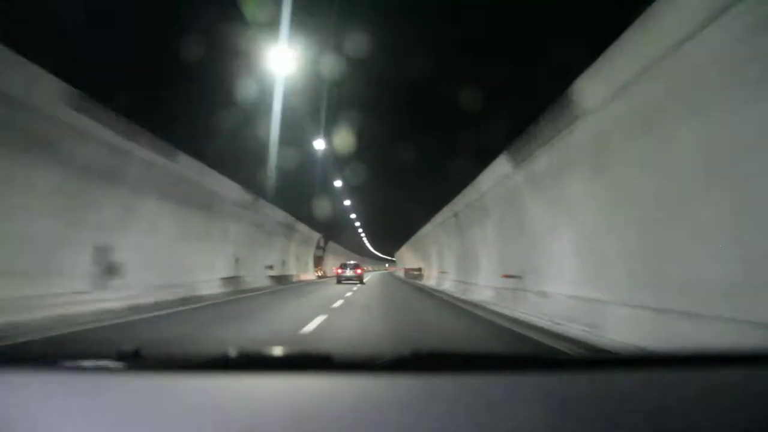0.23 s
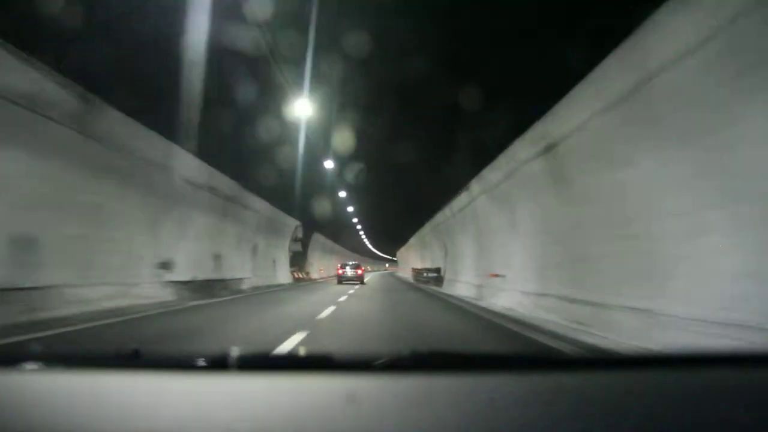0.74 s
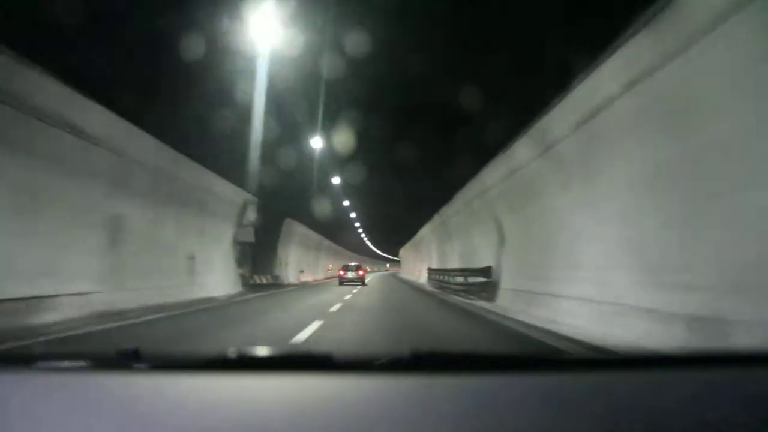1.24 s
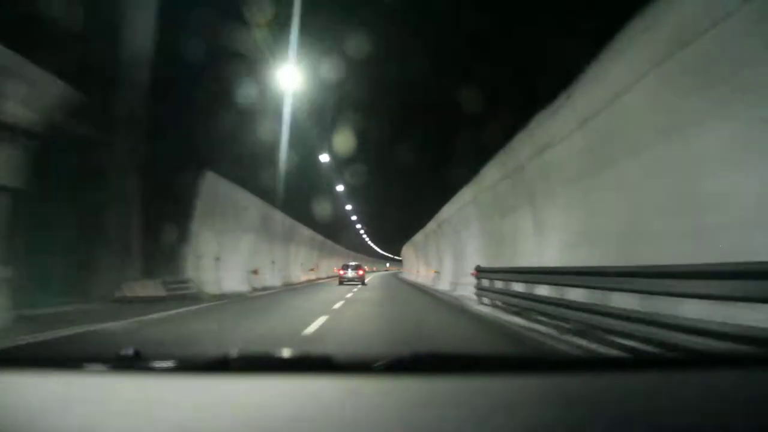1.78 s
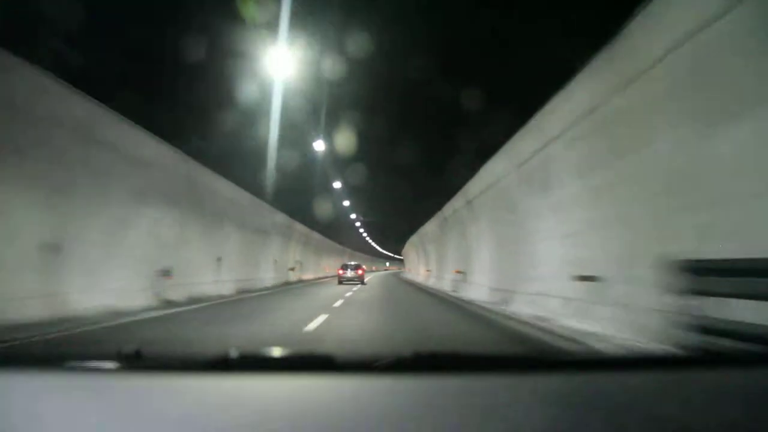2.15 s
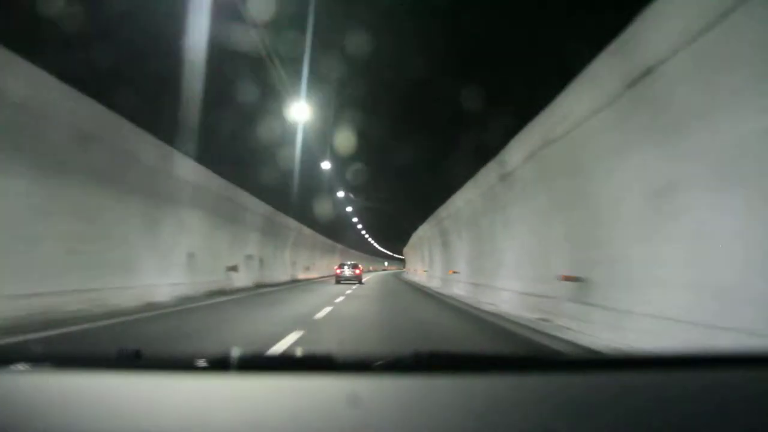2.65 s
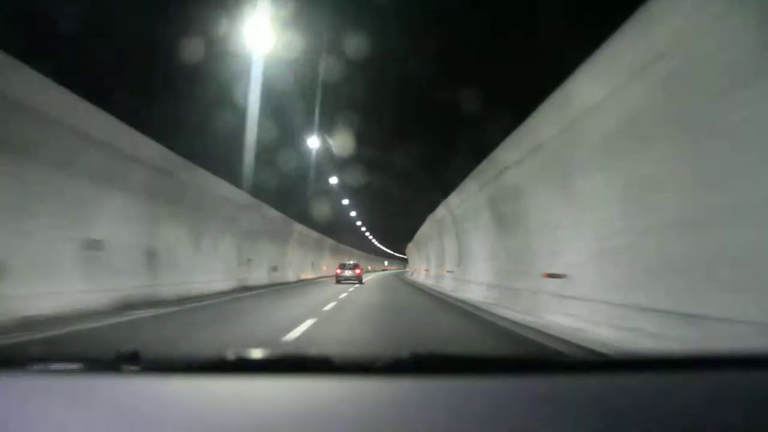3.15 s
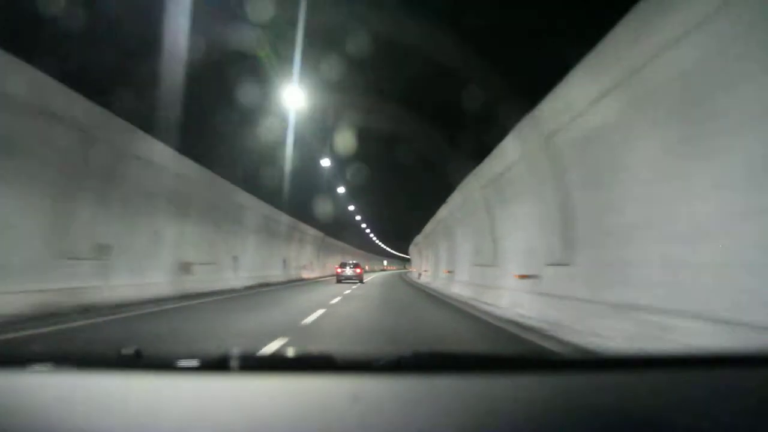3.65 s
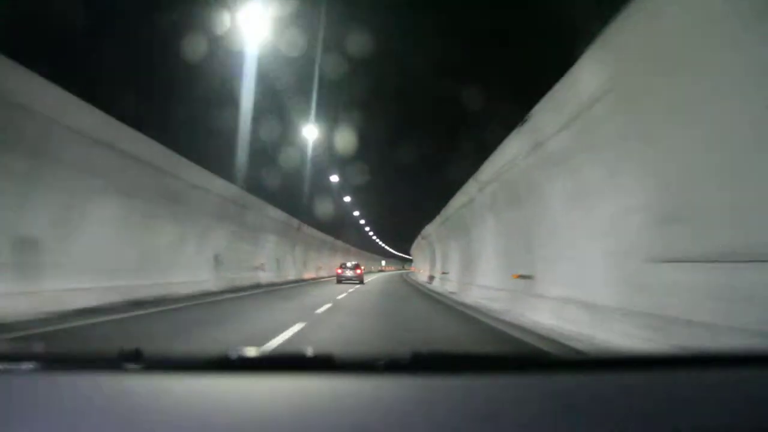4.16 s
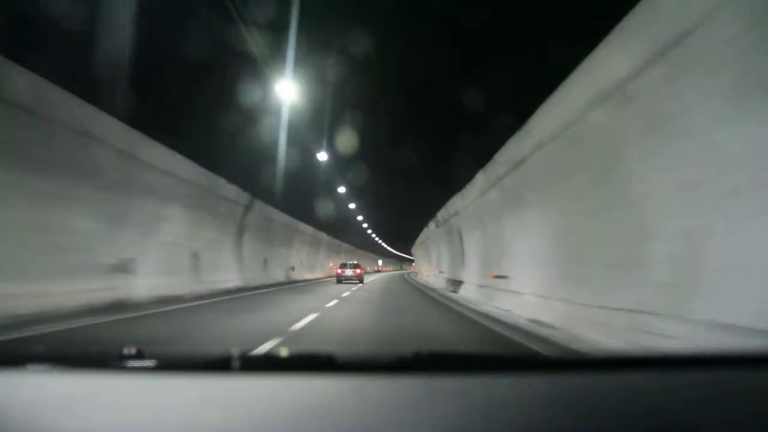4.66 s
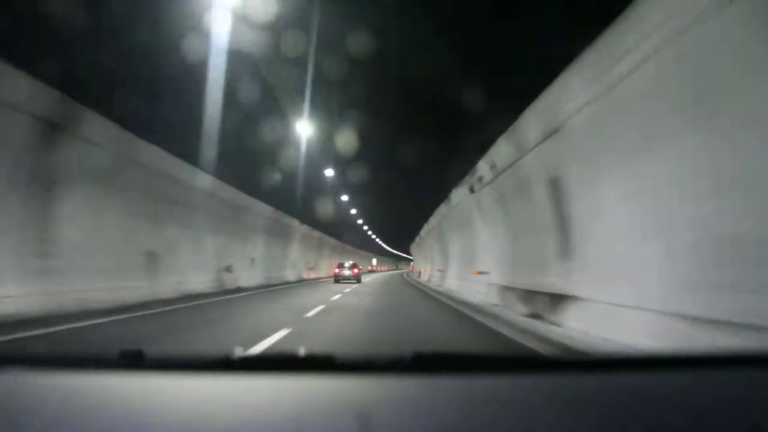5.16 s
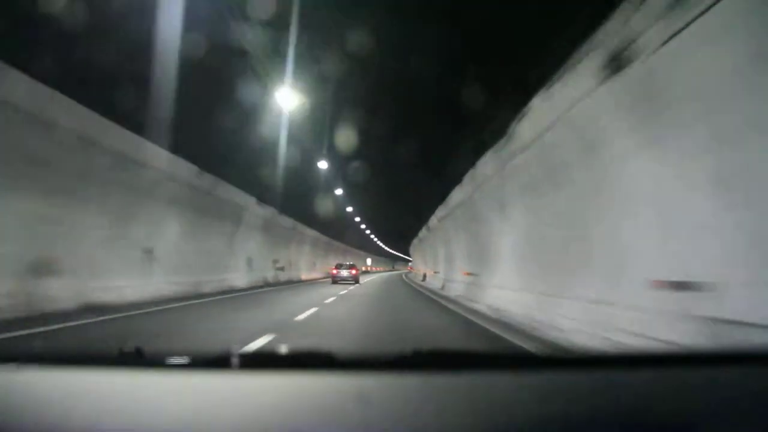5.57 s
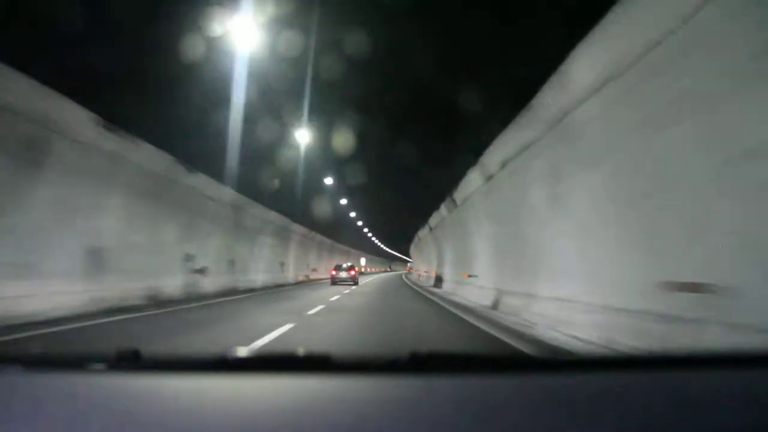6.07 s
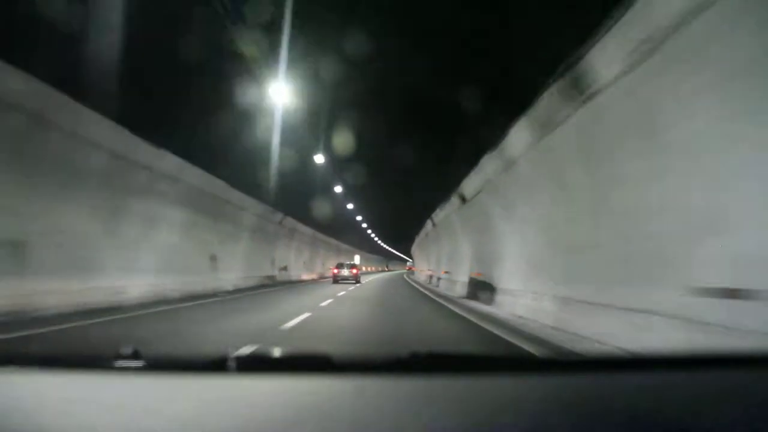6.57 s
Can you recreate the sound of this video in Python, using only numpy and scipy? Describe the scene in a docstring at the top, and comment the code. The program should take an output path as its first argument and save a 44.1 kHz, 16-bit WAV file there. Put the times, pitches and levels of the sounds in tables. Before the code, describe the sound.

Heard from inside, a car cruises fast through a tunnel, its booming road noise and low engine hum broken by slight bumps.

```python
"""Inside a car at steady motorway speed in a road tunnel, one microphone behind the windscreen.
From the start, rough asphalt rings the air in the tyres and cabin over tread roar and engine drone;
gears whine faintly, air hisses past the glass and the camera adds a thin, steady whistle.
Seams thump under the tyres from 0.4 s to 5.1 s, and the trim ticks clearest from 1.6 s to 2.7 s.
Near the end the hiss rises a little and a last long undulation of the road swells the rumble."""
import sys
import numpy as np
from scipy import signal
from scipy.fft import rfft, irfft
from scipy.io import wavfile
from scipy.ndimage import uniform_filter1d

SR = 44100
rng = np.random.default_rng(int(sys.argv[2]) if len(sys.argv) > 2 else 0)


def generate_wav(signal):
    """Clip the signal to [-1, 1] and save it as 16-bit WAV at the path in sys.argv[1]."""
    frames = np.transpose(np.atleast_2d(signal))
    scaled = np.clip(frames, -1, 1) * 32767
    pcm = np.round(scaled).astype(np.int16)
    wavfile.write(sys.argv[1], SR, pcm)


N = 301203
TIME = np.arange(N) / SR
BINS_HZ = np.fft.rfftfreq(N, 1 / SR)

# boom of the cabin, heard from inside (frequency [Hz], level [dB])
BOOM_SPECTRUM = [(95, -27), (122, -1.5), (170, -2.5), (200, -2), (250, -2.5), (275, -7), (305, -3.5),
                 (365, -2), (395, -13), (480, -34.5)]
# level of the hiss, swelling and dipping with the recorder's automatic gain (time [s], level [dB])
HISS_LEVELS = [(0.0, -43.5), (0.39, -44.5), (1.17, -43.5), (1.74, -47.0), (1.9, -44), (2.22, -47.0),
               (2.5, -44), (2.85, -45), (3.04, -42), (3.54, -46.5), (4.24, -44), (4.38, -45.5), (5.23, -42),
               (5.42, -45.5), (5.73, -41.5), (6.21, -42.5), (6.34, -40.5), (6.82, -41.5)]


def gain_of(db):
    """Decibels to a factor."""
    return 10 ** (np.asarray(db) / 20)


def unit_rms(x):
    """Scales to an rms of one."""
    return x / np.sqrt(np.mean(x ** 2) + 1e-20)


def envelope(rows):
    """A level curve as a gain for every sample."""
    return gain_of(np.interp(TIME, *np.transpose(rows)))


def colour(points):
    """A spectrum as a gain for every bin, falling steeply beyond its ends."""
    hz, db = np.transpose(points)
    skirts = 1 / (1 + (BINS_HZ / (2 * hz[-1])) ** 8) / (1 + (hz[0] / (2 * BINS_HZ + 1)) ** 8)
    return skirts * gain_of(np.interp(np.log(BINS_HZ + 1), np.log(hz), db))


def noise(shape):
    """Noise of rms one with the given spectral shape."""
    return unit_rms(irfft(rfft(rng.standard_normal(N)) * shape, N))


def wander(rate_hz):
    """A random drift of rms one, with changes up to about the given rate."""
    return noise(np.exp(-(BINS_HZ / rate_hz) ** 2))


def steadied(x, span_s):
    """Evens out swells slower than the span and keeps the quick flutter."""
    power = irfft(rfft(x ** 2) * np.exp(-(BINS_HZ * span_s) ** 2), N)
    return x / np.sqrt(np.maximum(power, 1e-3))


def tone(hz):
    """A sine of rms one that follows a pitch curve."""
    return np.sqrt(2) * np.sin(2 * np.pi * (np.cumsum(hz * np.ones(N)) / SR + rng.random()))


def passing(rows):
    """Pieces of road pass under the car as bell-shaped swells or dips: a gain curve per dB column."""
    return gain_of(sum(np.outer(db, np.exp(-(2 * (TIME - s) / length) ** 2)) for s, length, *db in rows))


def trim_ticks(ring_s=0.0012, tiny_per_s=18, tiny_db=-56, spread_db=2):
    """Plastic trim ticks: a few clear ones among many tiny ones."""
    # the clear ticks (time [s], level [dB])
    clear_ticks = [(1.586, -49), (2.014, -52), (2.0225, -45), (2.727, -47)]
    # bright click of the plastic (frequency [Hz], level [dB])
    tick_spectrum = [(1500, -20), (4000, 2), (8000, -2.5), (12000, -5), (15000, -12.5)]
    strengths = gain_of(tiny_db + spread_db * rng.standard_normal(N).clip(-2, 2))
    blows = strengths * (rng.random(N) < tiny_per_s / SR)
    for s, db in clear_ticks:
        blows[round(s * SR)] = gain_of(db)
    decays = signal.lfilter([1], [1, -np.exp(-1 / (ring_s * SR))], blows)
    return decays * noise(colour(tick_spectrum))


def electronic_whistle(hiss_gain, hz=15658.2, level_db=-49, follow=0.7, flutter=0.06):
    """A thin electronic whistle that flutters a little and rises and falls with the level of the hiss."""
    return gain_of(level_db) * hiss_gain ** follow * tone(hz) * (1 + flutter * wander(150))


def gear_whine(drift=0.00153, flutter=0.34):
    """Faint whines that drift with the speed and flutter with the load."""
    # notes of the gears (frequency [Hz], level [dB])
    whines = [(1045, -48.5), (1972, -63.5)]
    speed = 1 + drift * wander(2.7)
    return sum(gain_of(db) * tone(hz * speed) * (1 + flutter * wander(25)) for hz, db in whines)


def air_hiss(gust_db=0.6, flutter_db=0.5, seal_hz=3430, seal_width_hz=130, seal_db=2.5, treble_hz=5000):
    """Turbulent air hisses along the windscreen and half whistles at a door seal."""
    # the hiss from behind the glass (frequency [Hz], level [dB])
    hiss_spectrum = [(900, -25), (1600, 1.5), (1850, -1.5), (2650, 0.5), (3050, -0.5), (3400, -0.5),
                     (4050, -4.5), (4500, -10), (5900, -17.5), (6700, -19.5), (8000, -25), (11000, -26.5),
                     (12500, -30.5), (15500, -28.5)]
    # its treble, relative to the rest (time [s], level [dB])
    treble_lift = [(0, -.5), (3.1, -.5), (3.6, 1), (4.3, 2), (5.4, .3), (6.8, -0.5)]
    eddies_db = gust_db * wander(22) + flutter_db * wander(160)
    seal_peak = gain_of(seal_db / (1 + (2 * (BINS_HZ - seal_hz) / seal_width_hz) ** 2))
    hiss = noise(colour(hiss_spectrum) * seal_peak) * gain_of(eddies_db)
    highpass = 1 - 1 / (1 + (BINS_HZ / treble_hz) ** 8)
    treble = irfft(rfft(hiss) * highpass, N)
    return envelope(HISS_LEVELS) * (hiss + (envelope(treble_lift) - 1) * treble)


def suspension_rumble(level_db=-27.5, bounce_db=1, wheel_hz=16, wobble=0.0053):
    """Bumps come up through the springs, along with the beat of the turning wheels."""
    # rumble through the springs (frequency [Hz], level [dB])
    rumble_spectrum = [(12, -38.5), (22, -23.5), (31, -13.5), (42, -14.5), (52, -8.5), (64, -9.5),
                       (77, 2.5), (100, -1), (125, -5.5), (160, -18)]
    # long undulations that work the springs (centre time [s], length [s], extra rumble [dB])
    undulations = [(1.1, .25, 6), (2.6, 0.44, 4), (6.36, 0.31, 7)]
    # out-of-round tyres (order [multiple of wheel speed], level [dB])
    wheel_orders = [(2, -53), (3, -40.5), (5, -38.5)]
    swell = gain_of(level_db + bounce_db * wander(4)) * passing(undulations)[0]
    turning_hz = wheel_hz * (1 + wobble * wander(1.2))
    wheels = sum(gain_of(db) * tone(order * turning_hz) for order, db in wheel_orders)
    return swell * steadied(noise(colour(rumble_spectrum)), span_s=0.41) + wheels


def engine_drone(firing_hz=113.5, drift=0.01393, roughness=0.68, width_hz=13):
    """The firing note booms in the cabin, roughened by the shaking panels."""
    # the drone at the microphone (time [s], level [dB])
    drone_levels = [(0.0, -25.5), (0.82, -34.5), (0.95, -17.5), (1.08, -26), (1.68, -21), (2.36, -20),
                    (3.07, -32.5), (3.17, -17), (3.7, -30.5), (4.38, -22), (4.59, -30), (4.75, -20.5),
                    (4.94, -29.5), (5.39, -17), (5.61, -28.5), (6.24, -28.5), (6.37, -21), (6.82, -22.5)]
    firing = tone(firing_hz * (1 + drift * wander(2.3)))
    panels = noise(1 / (1 + ((BINS_HZ - firing_hz) / width_hz) ** 4))
    return envelope(drone_levels) * steadied(firing + roughness * panels, span_s=0.2)


def tread_roar(swell, level_db=-22.3, ripple_db=1):
    """Tread roar, thrown back by the tunnel walls; crowded reflections ripple its spectrum."""
    # the roar from inside the car (frequency [Hz], level [dB])
    roar_spectrum = [(280, -29), (400, -1.5), (470, 0.5), (510, -3), (610, 0), (680, -3.5), (790, -5),
                     (900, -7.5), (1050, -12.5), (1220, -20.5), (1390, -23), (1480, -34), (2000, -52)]
    ripple = unit_rms(uniform_filter1d(rng.standard_normal(len(BINS_HZ)), size=70))
    roar = noise(colour(roar_spectrum) * gain_of(ripple_db * ripple))
    return gain_of(level_db) * swell * steadied(roar, span_s=0.39)


def seam_thumps(decay_s=0.018):
    """A seam in the asphalt thumps the tyres and the cabin rings briefly."""
    # seams passing under the tyres (time [s], level [dB])
    seams = [(0.408, -14), (1.122, -17), (1.94, -16), (2.314, -15.5), (2.545, -13.5), (3.179, -11.5),
             (3.445, -13.5), (5.077, -21)]
    thumps = np.zeros(N)
    for s, db in seams:
        age = np.maximum(TIME - s, 0) / decay_s
        thumps += gain_of(db) * np.sqrt(age) * np.exp(1 - age)
    return thumps * steadied(noise(colour(BOOM_SPECTRUM)), span_s=0.024)


def cabin_boom(swell, level_db=-15.71):
    """The grain of the road rings the tyre cavities and the cabin air around the microphone."""
    # modes of the cabin and of the tyre cavity, whose mode rolling splits in two
    # (frequency [Hz], width [Hz], boost [dB])
    modes = [(174.5, 8.1, 4.5), (193.5, 8.5, 3.5), (214, 9.7, 5.5), (242.3, 6.3, 9.5), (294, 9, 2.5),
             (362.3, 11, 3)]
    modes_db = sum(db / (1 + (2 * (BINS_HZ - hz) / width) ** 2) for hz, width, db in modes)
    boom = noise(colour(BOOM_SPECTRUM) * gain_of(modes_db))
    return gain_of(level_db) * swell * steadied(boom, span_s=0.16)


def scene(patchy_db=0.2, roar_follow=0.15, boom_follow=0.24):
    """All sources meet at one microphone behind the windscreen."""
    # coarser and smoother asphalt (centre time [s], length [s], roar change [dB], boom change [dB])
    stretches = [(.63, 0.072, -2, -2.5), (.9, .4, 0.5, 1.4), (1.68, 0.41, -1, -1), (2.21, 0.15, -2.5, -1),
                 (2.92, 0.086, -3.5, 0.5), (4.1, 0.33, 0.8, -1.5), (5.04, 0.085, 1.5, 1.5),
                 (5.39, 0.14, -3, -0.2), (6.11, 0.13, -2, .5), (6.58, 0.14, 1, 0.5)]
    coarse, bumpy = passing(stretches) * gain_of(patchy_db * wander(6))
    hiss_gain = unit_rms(envelope(HISS_LEVELS))  # road noise swells with it, by `follow` dB per dB
    structure = suspension_rumble() + engine_drone() + cabin_boom(bumpy * hiss_gain ** boom_follow)
    structure += seam_thumps() + gear_whine() + trim_ticks()
    airborne = tread_roar(coarse * hiss_gain ** roar_follow) + air_hiss()
    return (structure + airborne + electronic_whistle(hiss_gain))[None]


def record(dry):
    """The recorder's steep band limit."""
    lowpass = signal.firwin(2047, cutoff=15800, window=("kaiser", 9), fs=SR)
    return signal.oaconvolve(dry, lowpass[None], "same")


dry = scene()
out = record(dry)
generate_wav(out)
```